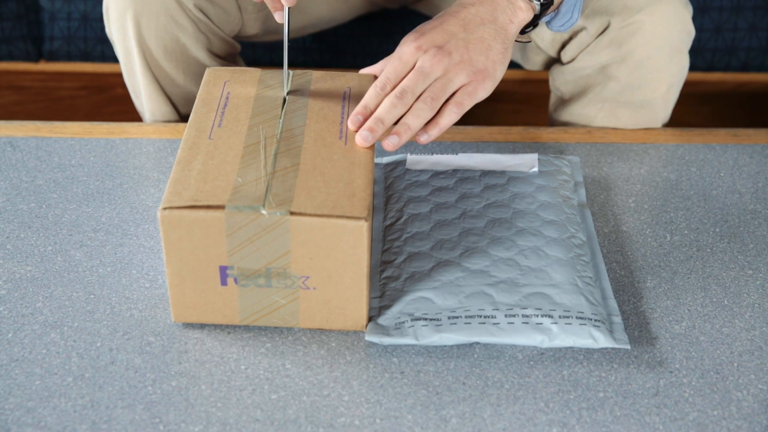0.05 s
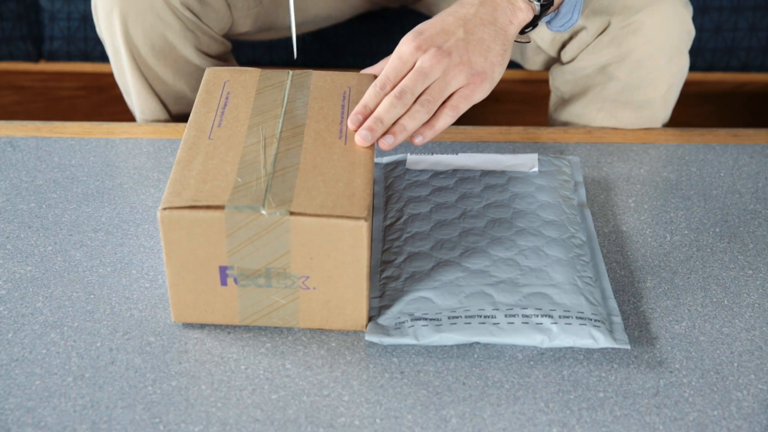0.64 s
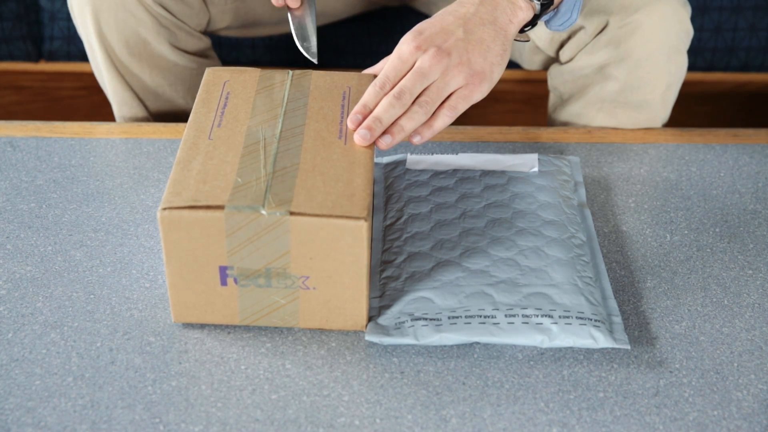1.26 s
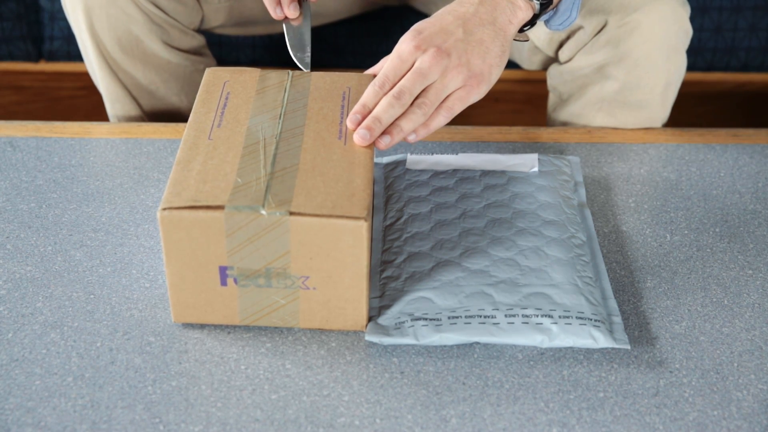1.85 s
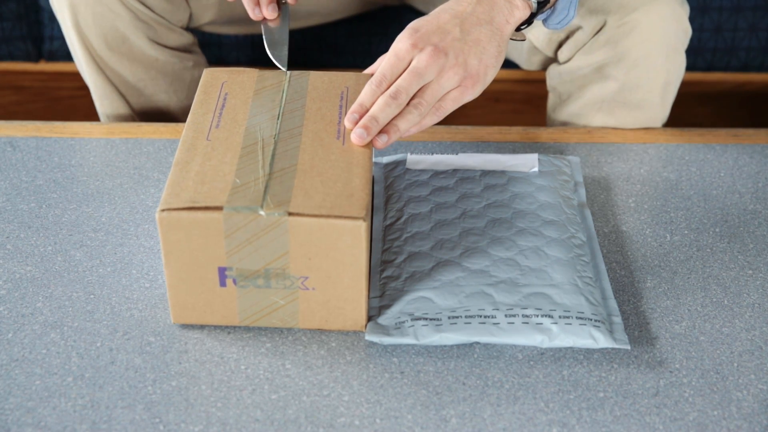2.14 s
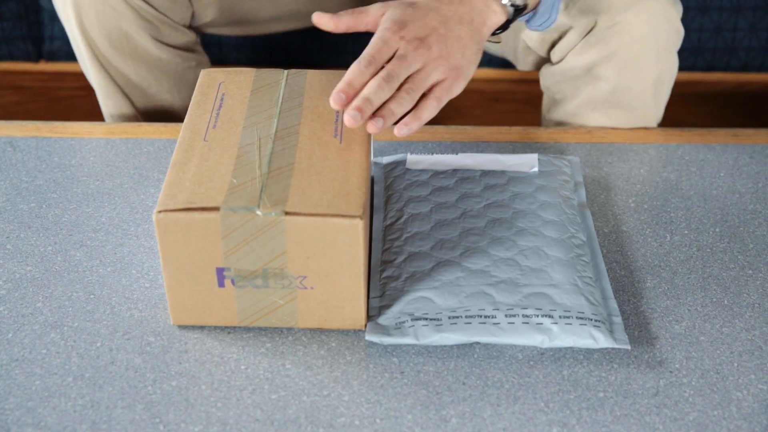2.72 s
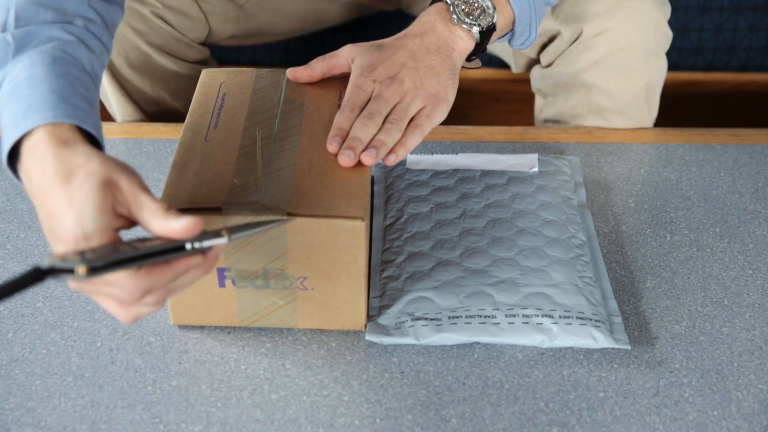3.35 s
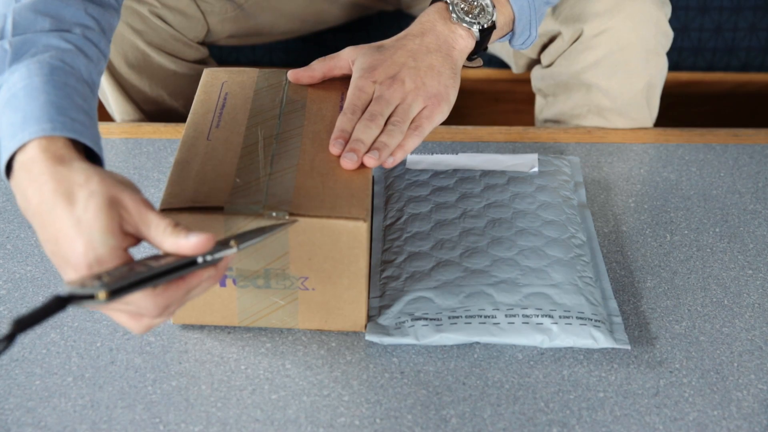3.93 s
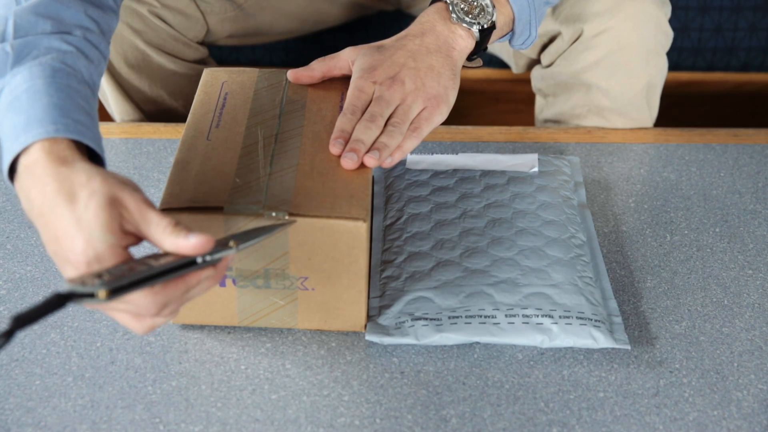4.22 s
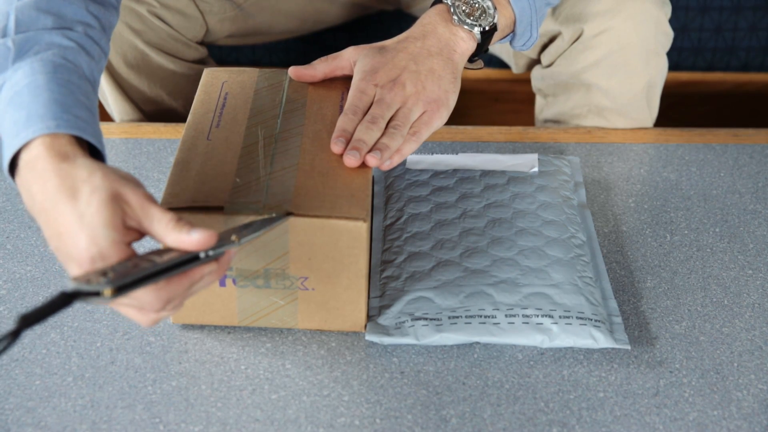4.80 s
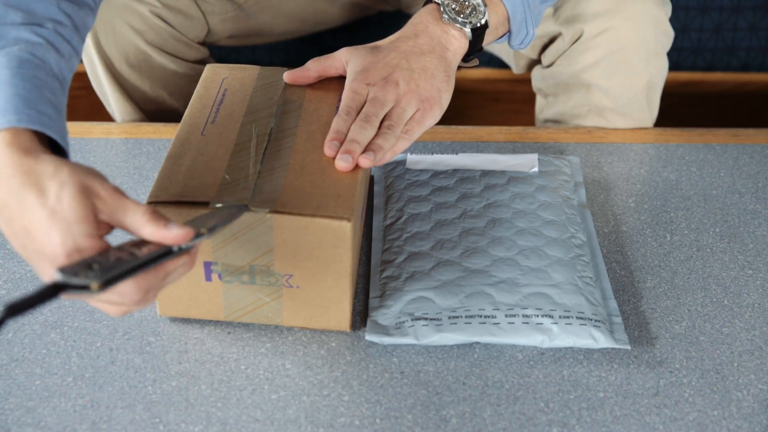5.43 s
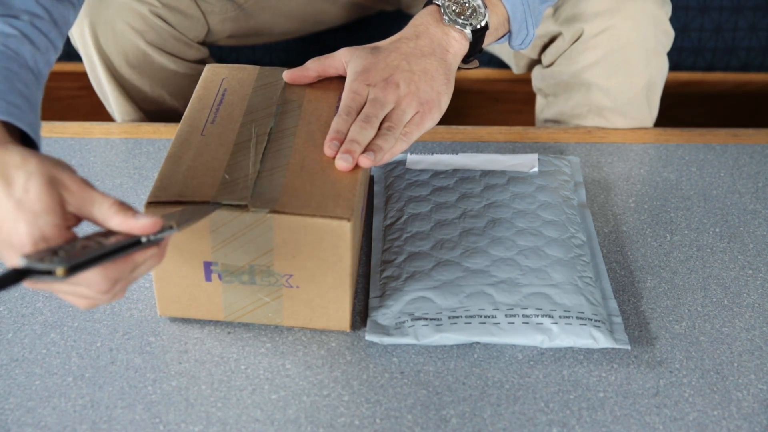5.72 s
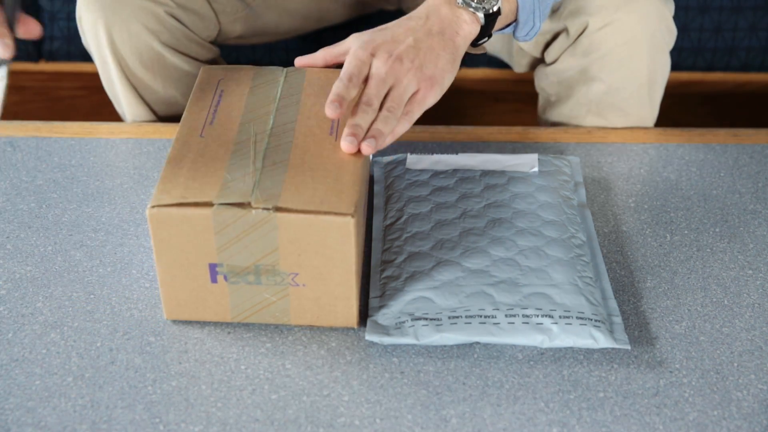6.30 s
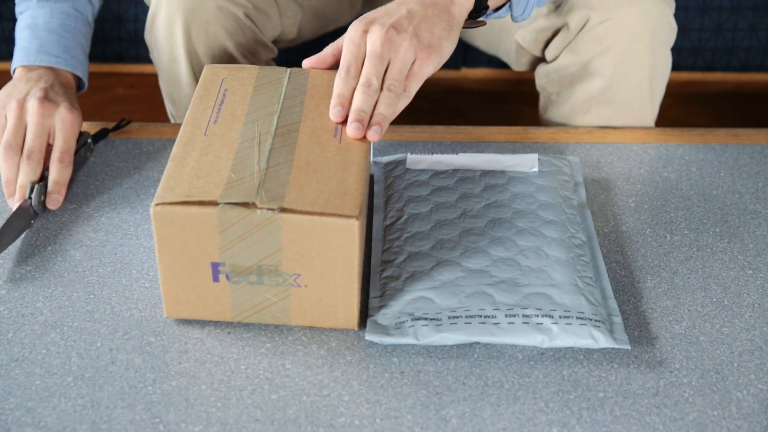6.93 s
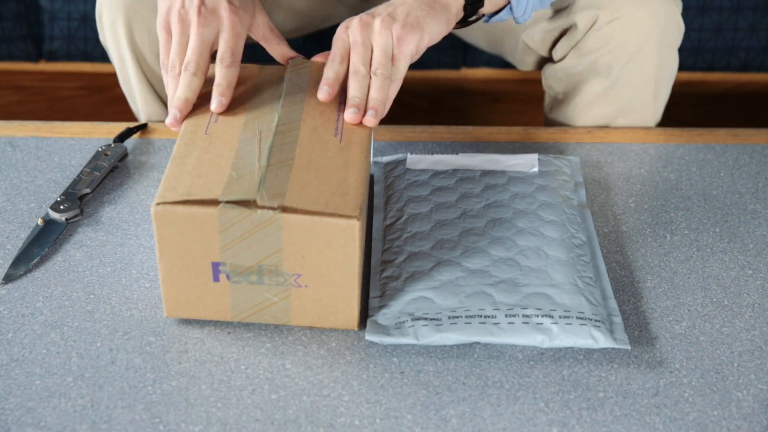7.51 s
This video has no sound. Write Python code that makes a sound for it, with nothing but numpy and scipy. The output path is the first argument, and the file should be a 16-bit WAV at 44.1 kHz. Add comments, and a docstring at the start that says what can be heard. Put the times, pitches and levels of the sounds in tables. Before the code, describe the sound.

Short raspy knife cuts and tape snaps on a cardboard box in a humming room, ending with the knife dropped loudly on a table.

```python
"""In a small room, over droning ventilation, a folding knife slits the packing tape on a cardboard box.
The tape snaps, and the blade squeaks, bumps the box and rasps as it parts one fibre after another.
The knife is then dropped: table and steel ring, loud enough to overload the microphone.
It rocks over onto its side, and a hand lands on the box with a dull thump."""
import sys
import numpy as np
from scipy import signal
from scipy.fft import rfft, irfft, next_fast_len
from scipy.io import wavfile
from scipy.ndimage import uniform_filter1d

SR = 44100
rng = np.random.default_rng(int(sys.argv[2]) if len(sys.argv) > 2 else 0)


def generate_wav(signal):
    """Clip the signal to [-1, 1] and save it as 16-bit WAV at the path in sys.argv[1]."""
    frames = np.transpose(np.atleast_2d(signal))
    scaled = np.clip(frames, -1, 1) * 32767
    pcm = np.round(scaled).astype(np.int16)
    wavfile.write(sys.argv[1], SR, pcm)


N = 337806
TIME = np.arange(N) / SR

# borders of the low, mid, high and top bands of the cutting sounds: (frequency [Hz])
BAND_EDGES = [180, 1000, 3000, 7000, 15500]
# tones of the hollow box: (pitch [Hz], relative level [dB], ring time [s])
BOX_TONES = [(285, -12, .18), (363, -10, 0.25), (430, 0.5, 0.053), (510, -3.5, 0.24), (562, -3.5, 0.18),
             (723, -23, .12), (873, 2.5, 0.082), (1190, -25, 0.12), (1390, -16, 0.11)]
# tones of the steel blade: (pitch [Hz], relative level [dB], ring time [s])
STEEL_TONES = [(4200, 10, .08), (6212, -21, .16), (6440, -12, .12), (7612, -16, 0.04421), (8500, 15, 0.13),
               (10300, -6, .1), (12122, -12, 0.07151)]


def undb(db):
    """Turn decibels into a factor to multiply a sound by."""
    return 10 ** (np.asarray(db) / 20)


def level(x, db):
    """Scale a sound to an average (rms) level."""
    return x * undb(db) / np.sqrt(np.mean(x ** 2) + 1e-20)


def band(x, lo_hz, hi_hz, order=3):
    """Keep what lies between two frequencies."""
    sos = signal.butter(order, [lo_hz, min(hi_hz, .45 * SR)], "band", fs=SR, output="sos")
    return signal.sosfilt(sos, x)


def colour(x, points):
    """Shape bass and treble along (frequency [Hz], gain [dB]) points."""
    hz, db = np.transpose(points)
    size = next_fast_len(len(x))
    freqs = np.arange(size // 2 + 1) * SR / size
    gain = undb(np.interp(np.log(freqs + 1), np.log(hz), db))
    return irfft(rfft(x, size) * gain, size)[:len(x)]


def add(out, start_s, x):
    """Mix a sound in at a given time."""
    i = int(np.clip(start_s * SR, 0, N - 1))
    out[i:i + len(x)] += x[:N - i]


def fade(t, t60):
    """Die away by 60 dB in t60 seconds, the ring time."""
    return np.exp(-np.log(1000) * t / t60)


def ring(tones):
    """A struck object rings with several tones, each fading at its own rate."""
    t = TIME[:SR // 2]
    size = np.sqrt(sum(undb(db) ** 2 for _, db, _ in tones) / 2)
    return sum((-1) ** k * undb(db) * np.sin(2 * np.pi * hz * t) * fade(t, t60)
               for k, (hz, db, t60) in enumerate(tones)) / size


def crack(levels_db, edges_hz, t60, damping, rise_s):
    """A burst of noise in bands; with damping above 1, the higher bands die sooner."""
    t, out = TIME[:SR // 12], 0
    span = .004 * SR  # levels count as if all the energy fell within 4 ms
    for k, db in enumerate(levels_db):
        push = np.minimum(t / rise_s, 1) * fade(t, t60 / damping ** k)
        burst = band(rng.standard_normal(len(t)) * push, edges_hz[k], edges_hz[k + 1])
        out = out + burst * undb(db) * np.sqrt(span / np.sum(burst ** 2))
    return out


def duct_hum(hz, width_hz):
    """A duct rings with noise near one pitch: it throbs, but holds its level in the long run."""
    freqs = np.arange(N // 2 + 1) * SR / N
    hum = irfft(rfft(rng.standard_normal(N)) / (1 + ((freqs - hz) / width_hz) ** 2), N)
    return hum / np.sqrt(uniform_filter1d(hum ** 2, size=15000) + 1e-12)


def ventilation():
    """Two low duct hums waver over the rumble and thin hiss of moving air."""
    # relative levels of the wavering hums: (time [s], lower hum [dB], upper hum [dB])
    hum_levels = [(0.0, -56, -51.5), (0.66, -62, -49), (1.04, -50, -52), (1.28, -43.5, -46),
                  (1.71, -46, -54.5), (2.09, -50, -51), (2.88, -45, -45.5), (4.97, -47.5, -53.5),
                  (5.95, -50.5, -42.5), (6.25, -54, -55), (6.81, -44, -45), (7.66, -70, -57)]
    # tone colour of the air: (frequency [Hz], gain [dB])
    air_colour = [(12, -54), (20, -18), (49, -13.5), (87, -8), (112, 12.5), (148, -10), (175, -19.5),
                  (213, -14.5), (306, -27), (342, -21.5), (427, -28.5), (811, -28.5), (2330, -33),
                  (6190, -49.5), (15500, -52)]
    # the hiss sinks and creeps back: (time [s], gain [dB])
    hiss_dips = [(0, 0), (.5, 2.5), (.76, -8), (1.2, .5), (2.2, -1), (2.8, 2.5), (4.2, .5), (5.3, 4.5),
                 (6.25, -3.5), (6.55, 1), (7.0, .5), (7.15, -9.5), (7.66, -6)]
    times, lower_db, upper_db = np.transpose(hum_levels)
    lower = duct_hum(hz=87, width_hz=5) * undb(np.interp(TIME, times, lower_db) + 4)
    upper = duct_hum(hz=143, width_hz=4) * undb(np.interp(TIME, times, upper_db) + 4.5)
    air = colour(rng.standard_normal(N), air_colour)
    rumble = level(band(air, 14, 68.4), -48) + level(band(air, 58.6, 194), -46.5)
    rumble += level(band(air, 189.8, 1990), -45.5)
    hiss = level(band(air, 5660, 11200, order=1), -56.5)
    dip_db = np.interp(TIME, *np.transpose(hiss_dips))
    return lower + upper + rumble * undb(.97 * dip_db) + hiss * undb(dip_db)


def room(x, build_s, wall_s, wall_db):
    """The room adds one clear wall echo and a short wash of echoes that lasts longest in the bass."""
    # the wash of echoes: (low edge [Hz], high edge [Hz], ring time [s], gain [dB])
    echo_bands = [(95, 606, 0.32, 1), (444, 1630, 0.2, -3), (1600, 4000, 0.22, -5),
                  (5060, 25000, 0.19, -10.5)]
    t, response = TIME[:SR // 2], 0
    for lo_hz, hi_hz, t60, db in echo_bands:
        tail = rng.standard_normal(len(t)) * fade(t, t60) * np.minimum(t / build_s, 1) ** 2
        response = response + band(tail / np.sqrt(np.sum(tail ** 2)), lo_hz, hi_hz) * undb(db)
    out = x + signal.fftconvolve(x, response)[:N]
    add(out, wall_s, undb(wall_db) * band(x, 298.94, 12000, order=1))
    return out


def box_bumps(ring_db, wall_t60, knock_hz, knock_t60):
    """A soft touch flexes the box wall briefly, with a higher knock and a faint hollow ring."""
    # blade or hand meets the box: (time [s], wall level [dB], wall pitch [Hz], knock level [dB])
    bumps = [(2.011, -19, 282, -25), (2.285, -20, 220, -42), (3.269, -35.5, 337, -58),
             (3.533, -15.5, 362, -27), (3.771, -26, 380, -33.5), (3.994, -22.5, 453, -29.5),
             (4.043, -28, 455.5, -43), (4.277, -25.5, 380, -35.5), (5.049, -31, 400, -52),
             (5.69, -21.5, 426, -21.5), (5.968, -29, 416, -32), (6.168, -27.5, 317, -44.5),
             (7.639, -11.5, 155, -25.5), (7.644, -8.5, 338, -33)]
    out, box = np.zeros(N), ring(BOX_TONES)
    onset = np.minimum(TIME[:SR // 2] / .00051, 1)
    for start, wall_db, hz, knock_db in bumps:
        wall = undb(wall_db) * ring([(hz, 0, wall_t60)])
        knock = undb(knock_db) * ring([(knock_hz, 0, knock_t60)])
        hollow = undb(wall_db + ring_db) * box
        add(out, start, band(onset * (wall + knock + hollow), 72, 1400, order=2))
    return out


def blade_squeaks(waver_db):
    """The blade sticks and slips on tape and table: short tones whose pitch wavers quickly."""
    # squeaks: (start [s], end [s], first pitch [Hz], last pitch [Hz], level [dB])
    squeaks = [(0.115, .19, 574, 567, -42.5), (0.124, 0.19, 202, 201, -40), (0.202, 0.254, 565, 539, -43),
               (0.206, 0.28, 200.5, 182, -44), (0.159, 0.207, 6405, 5605, -52.5),
               (0.204, 0.264, 10460, 13900, -49.5), (5.871, 5.9, 7200, 10300, -46),
               (7.05, 7.082, 8209, 8140, -46), (7.309, 7.335, 8540, 7800, -36),
               (7.313, 7.331, 11500, 11200, -35)]
    out = np.zeros(N)
    for start, end, from_hz, to_hz, db in squeaks:
        count = max(int((end - start) * SR), 64)
        slip = level(uniform_filter1d(rng.standard_normal(count), size=int(3 * SR / from_hz)), waver_db)
        hz = np.linspace(from_hz, to_hz, count) * np.exp(slip - slip.mean())
        tone = np.sin(2 * np.pi * np.cumsum(hz) / SR)
        add(out, start, level(tone * signal.windows.tukey(count, .6), db))
    return out


def rasp(count, grains_per_s, scatter_db, rub_db, steel_db, patchy_db):
    """Parting fibres tick over a smooth rub, sounding through cardboard and steel; one row per band."""
    # tone colour of the cardboard: (frequency [Hz], gain [dB])
    cardboard = [(71, -45), (120, -8), (166, 2), (240, -17.5), (282, -1), (383, -6.5), (563, -15),
                 (690, -17), (863, -9), (1650, -17.5), (2440, -17), (3510, -28), (4480, -21), (5270, -26.5),
                 (15500, -34)]
    sizes = undb(scatter_db * np.minimum(rng.exponential(size=count), 4))
    grains = (rng.random(count) < grains_per_s / SR) * sizes * rng.choice([-1, 1], count)
    drag = level(grains, 0) + undb(rub_db) * rng.standard_normal(count)
    catches = np.repeat(rng.standard_normal(count), SR // 200)[:count]  # the edge catches every 5 ms
    drag = drag * undb(patchy_db * uniform_filter1d(catches, size=SR // 1000))
    steel = signal.fftconvolve(drag, ring(STEEL_TONES)[:SR // 150])[:count]
    sound = colour(drag + level(steel, steel_db), cardboard)
    return np.array([level(band(sound, lo, hi), 0) for lo, hi in zip(BAND_EDGES, BAND_EDGES[1:])])


def short_cuts(ease_db, attack_s, release_s):
    """The blade bites hardest as it breaks through, then the pressure eases."""
    # strokes: (start [s], length [s], rasp [dB], treble lift [dB per band], cardboard drumming [dB])
    strokes = [(.21, 0.079, -47.5, -7.5, -43.5), (0.36, 0.015, -39, 1, -38), (.411, 0.43, -51.5, -10, -63),
               (.595, 0.016, -34.5, -2, -47), (0.657, 0.016, -44, 1.5, -68),
               (1.758, 0.066, -64.5, 3, -49.5), (1.887, 0.12, -61.5, -1, -49),
               (2.009, 0.017613, -30, -4, -28), (3.765, 0.021, -45.5, -8.5, -41.5),
               (3.962, 0.13, -53.5, 0.5, -53), (4.142, 0.079, -54.5, 0.5, -73), (5.06, 0.16, -57.5, 2, -66),
               (5.25, 0.041, -51.5, -3, -52.5), (5.418, 0.01312, -30, -3.5, -28),
               (5.473, 0.082, -42, -4, -35), (5.67, .045, -32, -4, -31), (5.755, 0.13, -52, -5, -48.5),
               (5.854, 0.14, -47, -2.5, -41.5), (6.016, 0.053, -47.5, -1.5, -47.5),
               (6.124, 0.077, -55.5, -7, -46.5)]
    out = np.zeros(N)
    for start, length, db, bright_db, drum_db in strokes:
        t = TIME[:int(length * SR) + SR // 10]
        pressure = np.minimum(t / attack_s, 1) * undb(ease_db * (.5 - np.minimum(t / length, 1)))
        pressure = pressure * np.exp(-np.maximum(t - length, 0) / release_s)
        bands = rasp(len(t), grains_per_s=330, scatter_db=6, rub_db=-1, steel_db=-17, patchy_db=3)
        gains = undb([drum_db, db, db + bright_db, db + 2 * bright_db])
        add(out, start, pressure * (gains @ bands))
    return out


def long_slit(even_db, brighten):
    """One long pull along the seam; the harder the tape rips, the brighter its rasp."""
    # course of the pull: (time [s], tape rasp [dB], cardboard drumming [dB])
    pull = [(2.25, -87, -78), (2.27, -28, -27.5), (2.292, -33, -23), (2.35, -33.5, -31), (2.36, -41, -31),
            (2.39, -26.5, -33), (2.396, -31, -26.5), (2.434, -46, -36), (2.442, -21, -17),
            (2.466, -45.5, -43), (2.478, -26, -27), (2.496, -35.5, -43), (2.51, -30.5, -28),
            (2.576, -49, -40), (2.694, -44.5, -39.5), (2.75, -68, -79)]
    # added to the low, mid, high and top bands: (gain [dB])
    balance_db = [-4, -5, -7.5, -9]
    out = np.zeros(N)
    times, tape_db, board_db = np.transpose(pull)
    t = np.arange(times[0], times[-1], 1 / SR)
    rip_db, drum_db = np.interp(t, times, tape_db), np.interp(t, times, board_db)
    gains = undb([drum_db, rip_db, rip_db, rip_db + brighten * (rip_db - even_db)])
    bands = rasp(len(t), grains_per_s=600, scatter_db=2.5, rub_db=-1, steel_db=-18, patchy_db=2.5)
    add(out, times[0], undb(balance_db) @ (gains * bands))
    return out


def tape_snaps(ring_db, ping_db, ping_cycles, crack_db, crack_t60):
    """Tape gives way with a sharp crack; the freed tape pings briefly and the box rings with it."""
    # snaps: (time [s], pitch [Hz], relative level [dB], loss below the pitch [dB per octave])
    snaps = [(0.2086, 1850, -36, 2), (.352, 2980, -21, 6), (0.5884, 2970, -20.5, 3.5),
             (0.6521, 2350, -28.5, 2), (1.5715, 6230, -31, 38), (1.7977, 7260, -30, 21),
             (1.9662, 9300, -32, 10.5), (1.9858, 5700, -30, 14), (2.0263, 9300, -22.5, 4.5),
             (2.373, 6540, -28, 8), (2.3952, 13200, -20.5, 13), (2.413, 12000, -24.5, 10),
             (2.4768, 4200, -29.5, -1.5), (2.652, 5960, -39.5, 9), (2.731, 4500, -45, 15),
             (3.0181, 8900, -40.5, 7), (3.9949, 2270, -30, 2), (4.022, 6840, -36, 4.5),
             (4.0666, 3940, -38.5, 1), (4.155, 11200, -37.5, 3), (4.1896, 2880, -33, 6),
             (5.071, 3500, -41.5, 12), (5.179, 8804, -41.5, 1.5), (5.2489, 1790, -32.5, 6.5),
             (5.2559, 3280, -31.5, 20), (5.4254, 2550, -28, -2), (5.438, 6600, -31, 3),
             (5.529, 9100, -40, 11), (5.541, 1960, -33.5, 30), (5.676, 2450, -32.5, -2.5),
             (5.69, 7500, -36, 3), (5.868, 12100, -25.5, 15), (5.8911, 7220, -30, 15),
             (6.002, 9300, -38.5, 6), (6.0282, 4560, -40.5, -2), (6.0766, 13000, -27.5, 10),
             (6.0807, 2050, -29, 11), (6.0911, 12900, -20.5, 13), (6.285, 9000, -50, 1),
             (6.6912, 4860, -33.5, 7), (6.9193, 7850, -37.5, 6), (7.6357, 2480, -24.5, 8.5)]
    # middles of the four bands: (frequency [Hz])
    centres = [450, 1800, 4500, 10500]
    out, box = np.zeros(N), ring(BOX_TONES)
    for start, hz, db, loss_db in snaps:
        octaves = np.log2(np.array(centres) / hz)
        levels_db = db - loss_db * np.maximum(-octaves, .55 * octaves)  # gentler slope above the pitch
        first_fibre = crack(levels_db - 18.5, BAND_EDGES, t60=.012, damping=.94, rise_s=.002)
        add(out, start - .0062, first_fibre)  # it gives just before the snap
        add(out, start, crack(levels_db + crack_db, BAND_EDGES, crack_t60, damping=1.02, rise_s=.00021))
        ping = band(ring([(hz, 0, ping_cycles / hz)]), .33 * hz, 2.4 * hz, order=1)
        add(out, start, undb(db + ping_db) * ping)
        add(out, start, box * undb(levels_db[0] + ring_db))
    return out


def knife_drop(table_db, steel_db, clack_db, thud_db, clacks_per_hit):
    """Handle and blade bounce: each hit rings table and steel, then clacks again on the rebound."""
    # landing, then rocking over: (time [s], knock [dB], upper clack boost [dB], click [dB], blade [dB])
    hits = [(7.004, -13.5, 3, -27, -35.5), (7.0274, -1.5, -7, -23, -33), (7.036, -4, -6.5, -26, -46),
            (7.047, -13, 1.5, -40, -38), (7.0589, -5.5, -13.5, -25, -45), (7.069, -17, -8, -44, -43),
            (7.077, -19.5, 1.5, -36, -41), (7.226, -34, -20, -61, -75.5), (7.237, -21.5, -17, -59, -73),
            (7.2646, -17.5, -2, -23, -13), (7.278, -11, -6, -25, -36.5), (7.309, -13.5, -10, -46, -52),
            (7.332, -12.5, -11, -29, -31), (7.3378, -6.5, -10.5, -17.5, -32), (7.356, -15.5, -8, -29, -33),
            (7.3818, -32, 7.5, -25, -29.5), (7.4153, -23, -3, -27, -33.5)]
    # tones of the table top: (pitch [Hz], relative level [dB], ring time [s])
    table_tones = [(136, -17, 0.21), (211, -14.5, 0.17), (273, -8, 0.2), (285, -10.5, 0.31),
                   (340.3, -19, 0.51), (400, -8, .22), (488, -8, 0.095), (527, -6, 0.19), (575, -13, .15),
                   (620, -15, .09), (741, 2, .16), (834, -9.5, .1), (935, -20, .12), (925, -5, 0.12),
                   (1064.6, 1.5, 0.14), (1066, -1, 0.16), (1107, -6, 0.076), (1350, -2, .075),
                   (1420, -5, 0.083), (1632, -8, .06), (1790, -16, .06)]
    rebound_s, weaker_db, duller_db = .005, 7, 12
    out, table, steel = np.zeros(N), ring(table_tones), ring(STEEL_TONES)
    for start, knock_db, hard_db, click_db, blade_db in hits:
        add(out, start, table * undb(knock_db + table_db) + steel * undb(blade_db + steel_db))
        add(out, start, crack([knock_db + thud_db], [150, 400], t60=.072, damping=1, rise_s=.0018))
        for k in range(clacks_per_hit):
            clack = undb(clack_db) * crack([knock_db, knock_db + hard_db], [560, 1050, 2500],
                                           t60=.045, damping=1.26, rise_s=.00031)
            click = crack([click_db, blade_db], [2700, 6500, 13000], t60=.011, damping=.83, rise_s=.0003)
            add(out, start, undb(-k * weaker_db) * (clack + undb(-k * duller_db) * click))
            start += rebound_s * rng.uniform(.8, 1.2)
    return out


def scene():
    """Cutting, then the dropped knife, all in one room with its ventilation."""
    sound = short_cuts(ease_db=3, attack_s=.0025, release_s=.013)
    sound += long_slit(even_db=-27, brighten=.15)
    sound += tape_snaps(ring_db=-19, ping_db=10.5, ping_cycles=12.9, crack_db=-1.5, crack_t60=.008)
    sound += blade_squeaks(waver_db=-21)
    sound += box_bumps(ring_db=-20.5, wall_t60=.028, knock_hz=1212, knock_t60=.039)
    sound += knife_drop(table_db=-2.5, steel_db=-21, clack_db=-2, thud_db=-10.5, clacks_per_hit=2)
    return (room(sound, build_s=.0027, wall_s=.015, wall_db=-14) + ventilation())[None]


def record(dry):
    """The loudest clacks overload the microphone and clip; the highest treble is cut."""
    top_hz = 15900
    clipped = np.clip(dry, -1, 1)
    return signal.sosfilt(signal.ellip(8, .2, 70, top_hz, fs=SR, output="sos"), clipped)


dry = scene()
out = record(dry)
generate_wav(out)
```